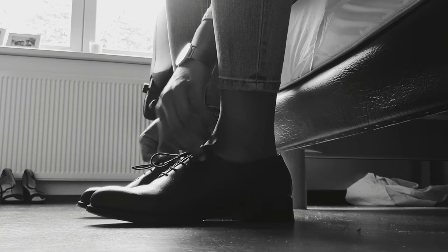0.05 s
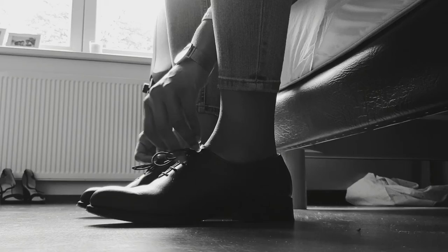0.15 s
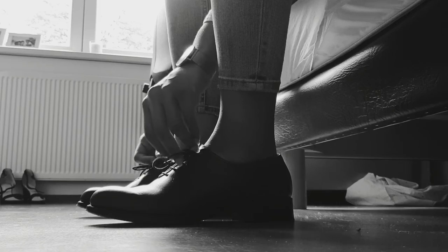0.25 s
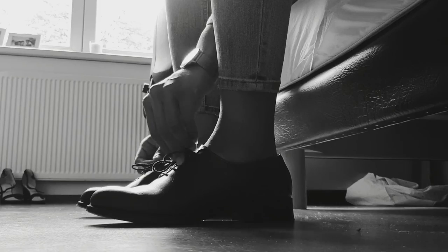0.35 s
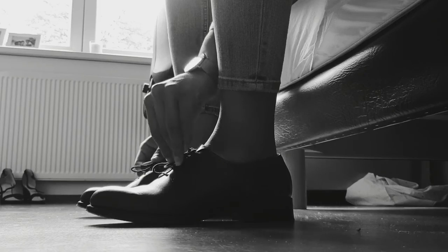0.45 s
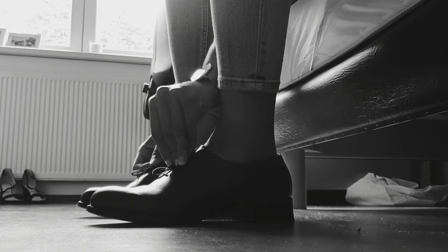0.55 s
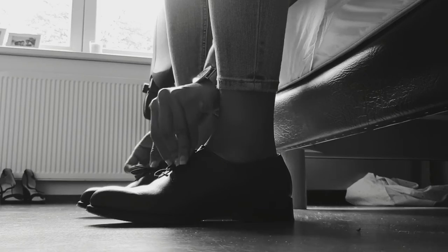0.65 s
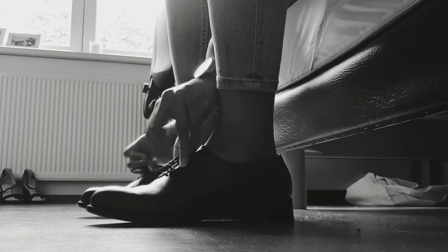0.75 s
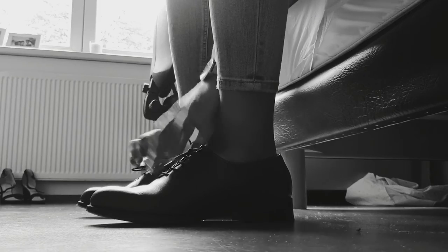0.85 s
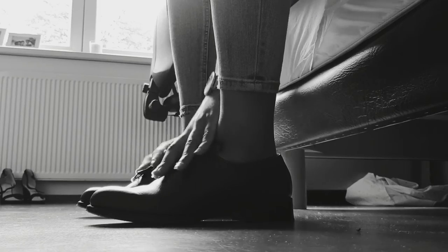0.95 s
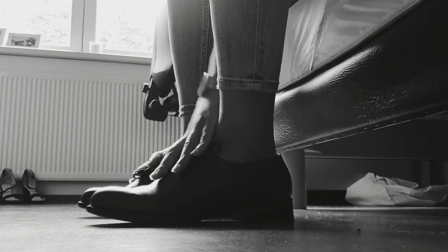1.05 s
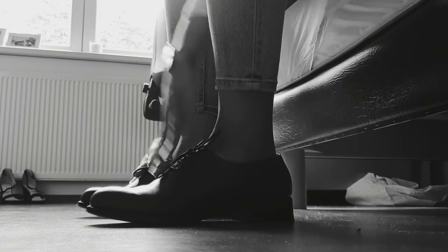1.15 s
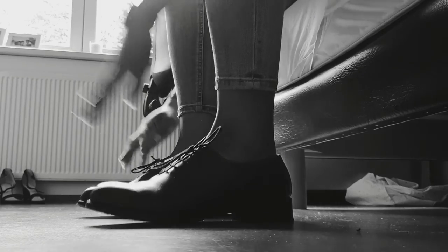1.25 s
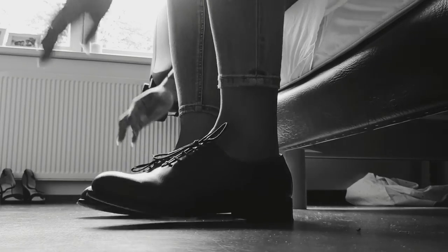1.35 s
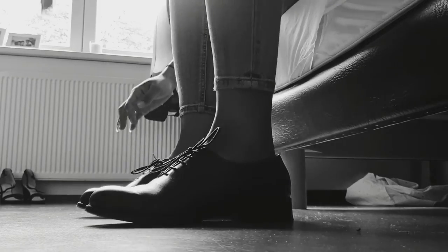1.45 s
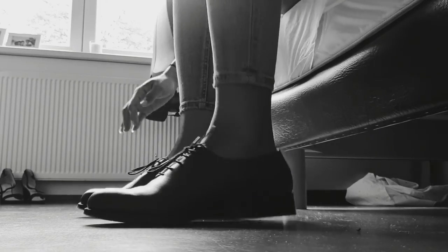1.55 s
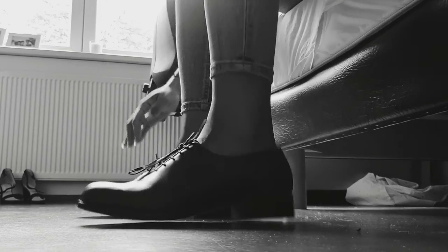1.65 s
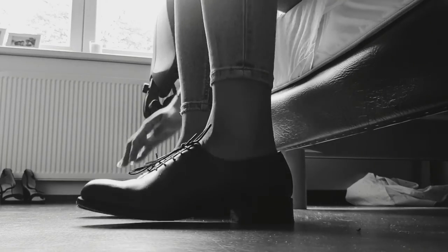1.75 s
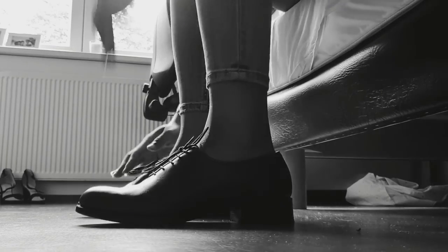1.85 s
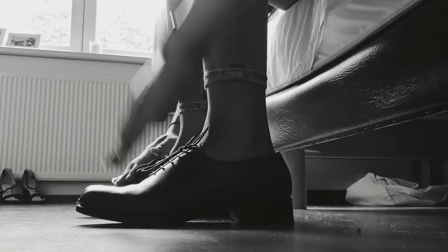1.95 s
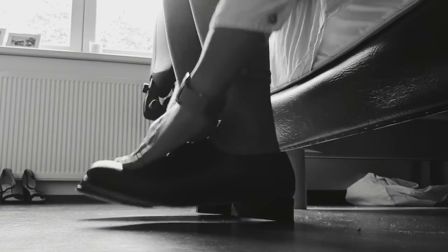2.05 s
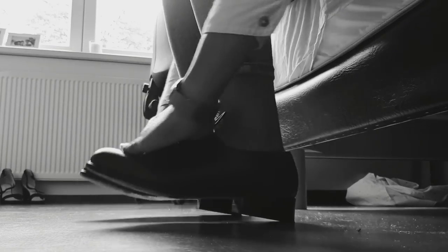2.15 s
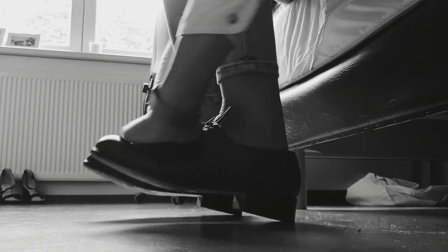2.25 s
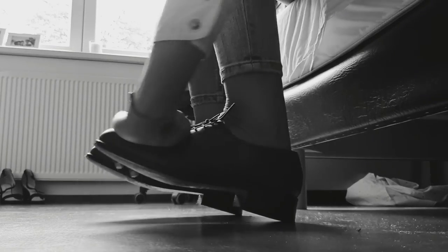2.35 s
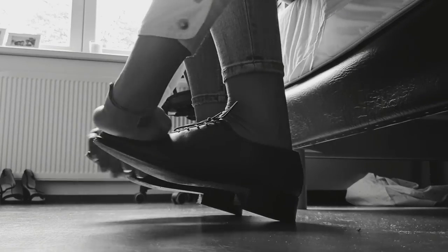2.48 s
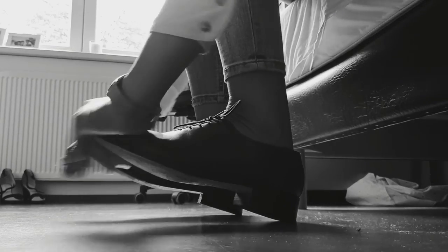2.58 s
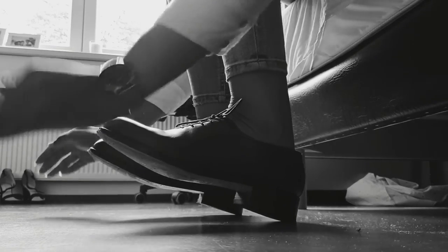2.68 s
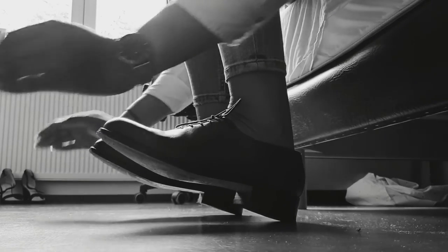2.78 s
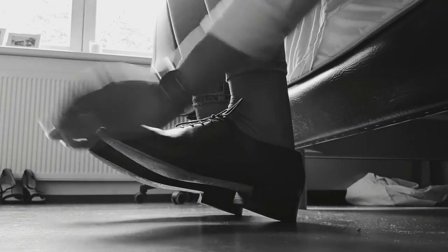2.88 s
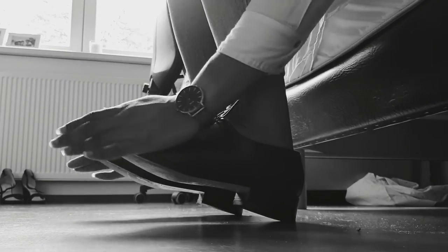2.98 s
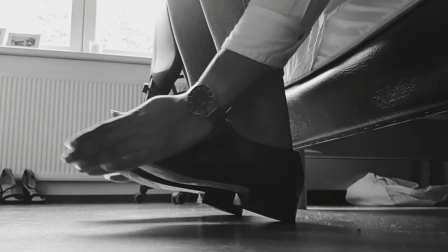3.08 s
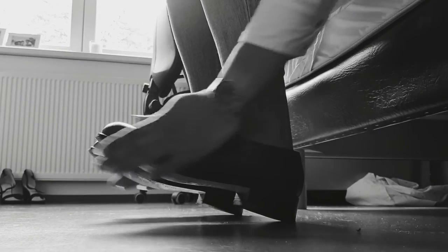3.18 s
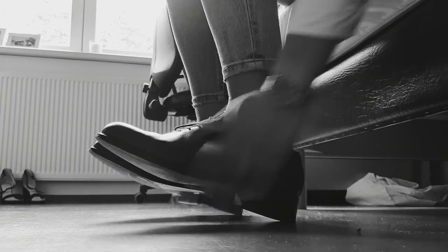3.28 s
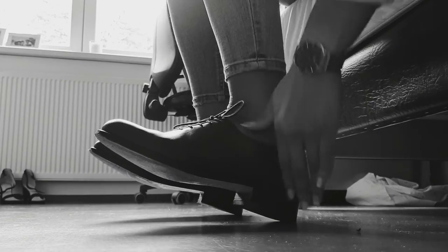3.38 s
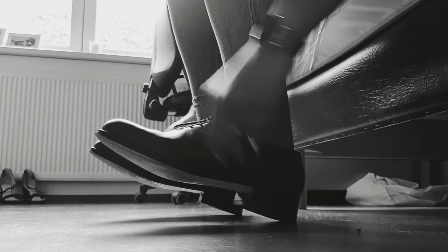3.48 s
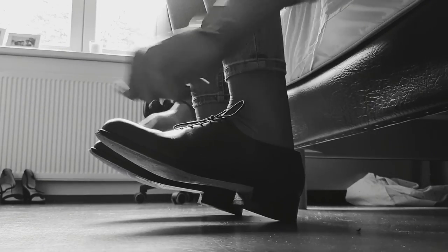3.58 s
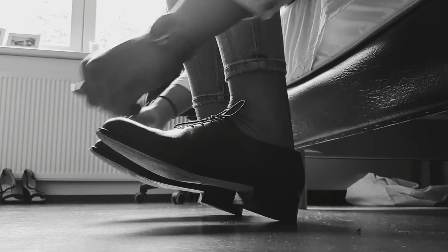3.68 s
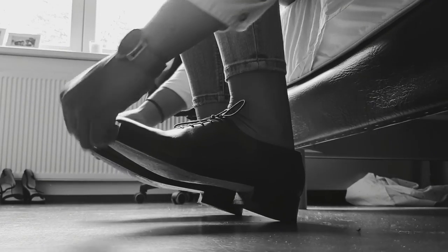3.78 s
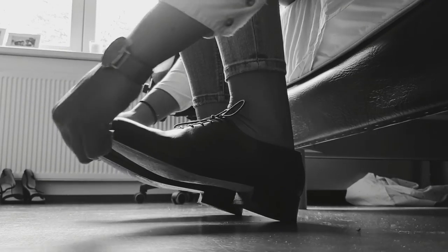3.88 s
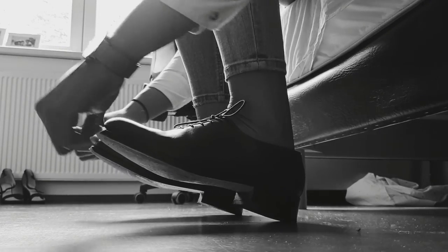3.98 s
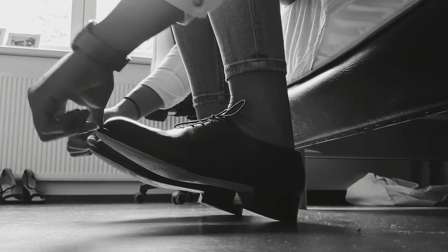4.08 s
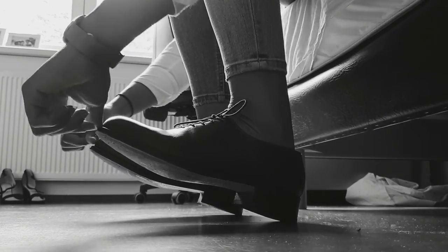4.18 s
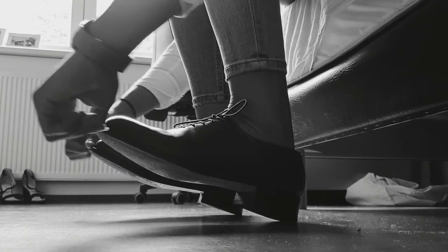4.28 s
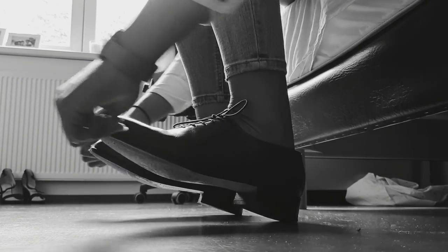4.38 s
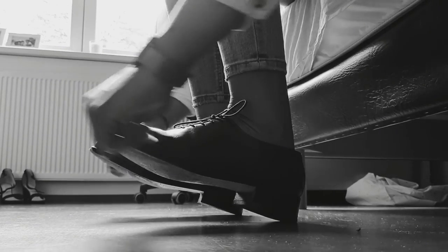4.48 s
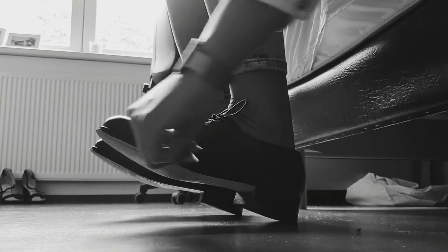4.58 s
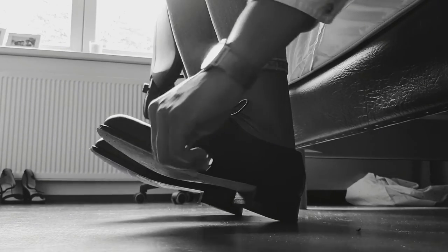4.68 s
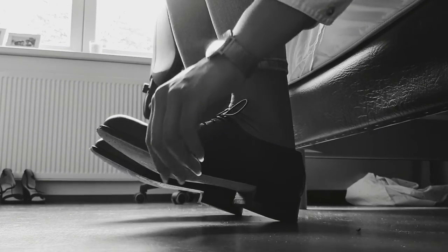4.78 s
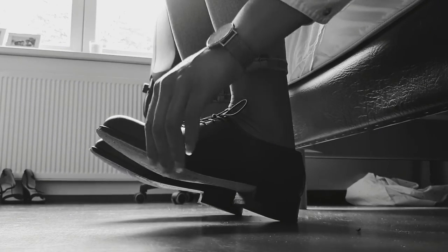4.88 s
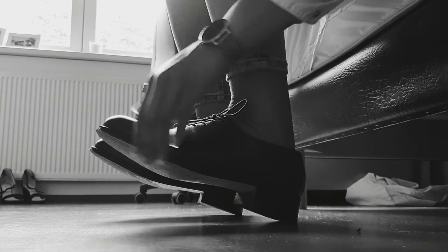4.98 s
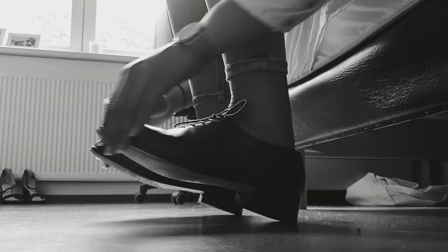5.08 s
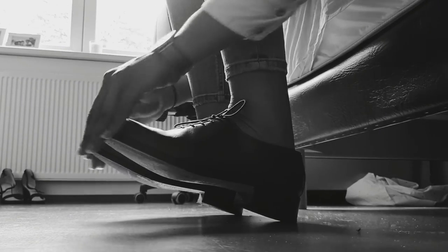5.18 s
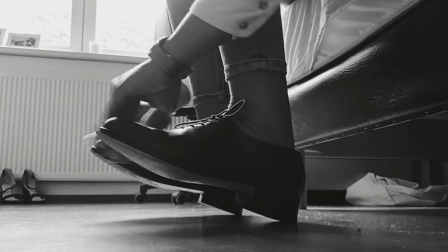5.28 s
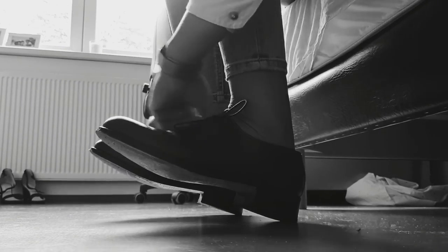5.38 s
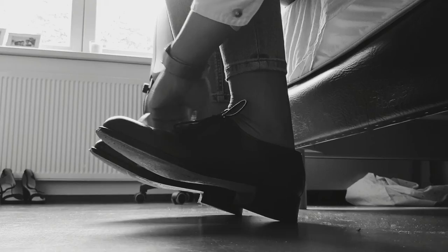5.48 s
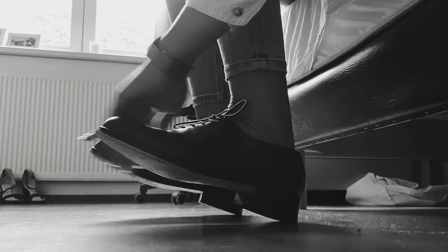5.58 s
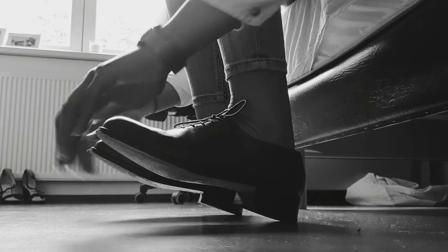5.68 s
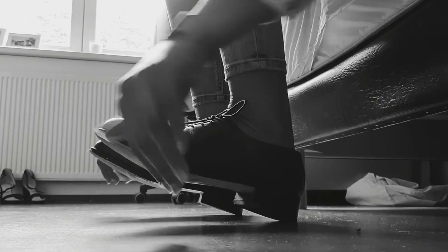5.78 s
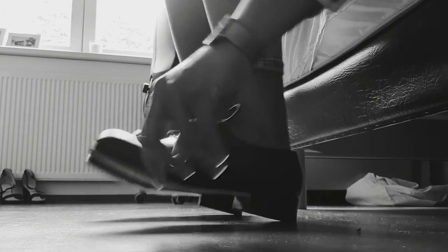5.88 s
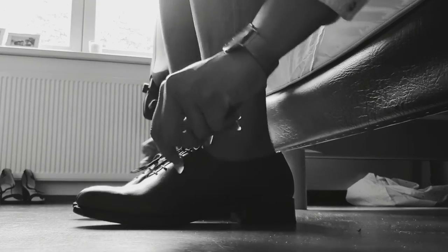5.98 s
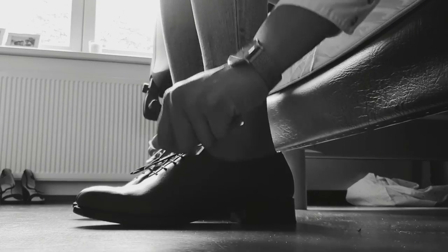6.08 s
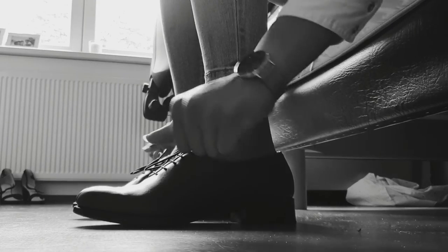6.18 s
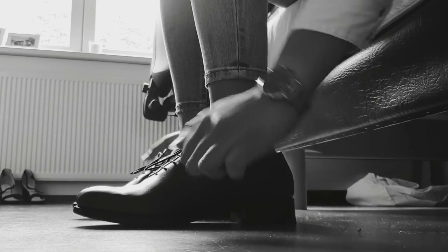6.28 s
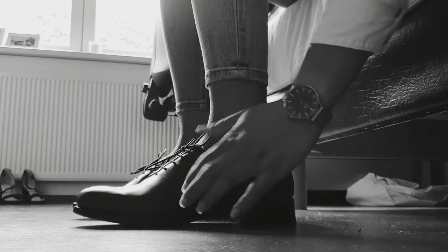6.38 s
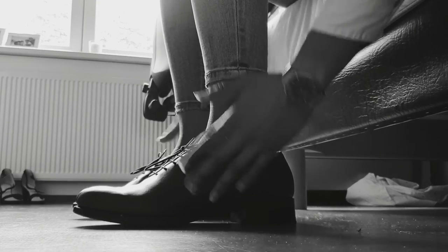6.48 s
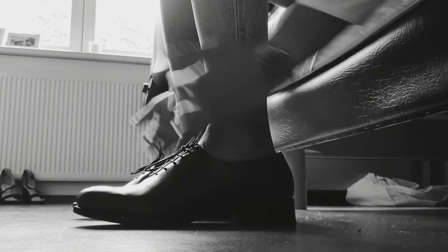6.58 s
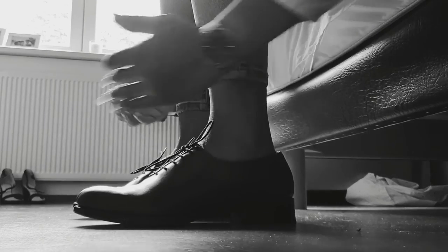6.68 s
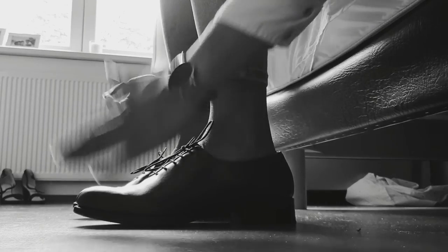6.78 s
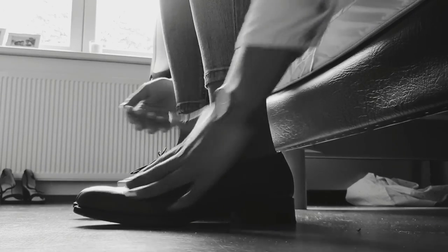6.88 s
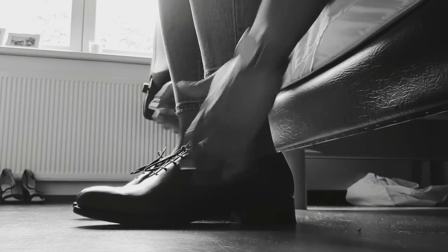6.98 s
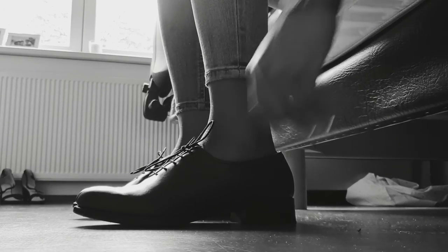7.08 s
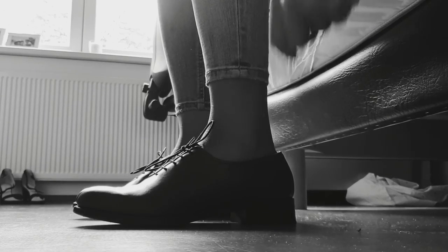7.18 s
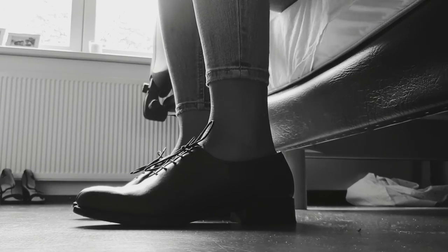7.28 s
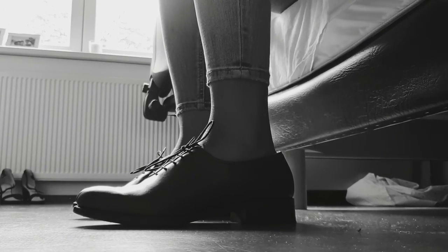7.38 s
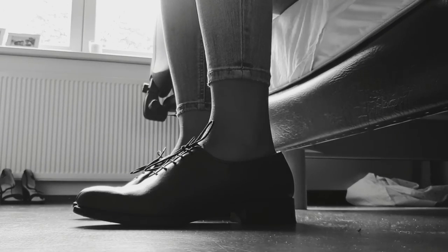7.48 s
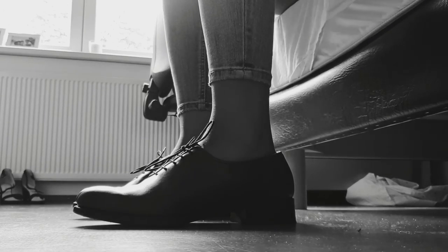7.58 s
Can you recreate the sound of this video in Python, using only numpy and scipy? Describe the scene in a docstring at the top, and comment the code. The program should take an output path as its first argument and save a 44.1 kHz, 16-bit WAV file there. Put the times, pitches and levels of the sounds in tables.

```python
"""Leather shoes on a hard bedroom floor

Close by at floor level, fingers finish the laces, feet shift and palms brush over the leather.
Two soles then slap down almost together, and the hands give a few last touches and wipes.
Impacts are filtered pulses with noise bursts and a room tail, rubbing is shaped noise,
and a wavering sine hum and low noise rumble lie faintly underneath."""
import sys
import numpy as np
from scipy import signal
from scipy.fft import rfft, irfft, next_fast_len
from scipy.io import wavfile
from scipy.ndimage import uniform_filter1d, map_coordinates

SR = 44100
rng = np.random.default_rng(int(sys.argv[2]) if len(sys.argv) > 2 else 0)


def waveform_to_disk(signal):
    """Save audio, clipped to [-1, 1], as 16-bit WAV at the path in sys.argv[1]."""
    frames = np.transpose(np.atleast_2d(signal))
    scaled = np.clip(frames, -1, 1) * 32767
    samples = np.round(scaled).astype(np.int16)
    wavfile.write(sys.argv[1], SR, samples)


N = 337232  # length in samples

# Wavering low hum, level over time: time_s, level_db
HUM_LEVEL = [(0, -70), (1.1, -66), (1.5, -71), (2.5, -59), (5.5, -59), (5.9, -66), (6.6, -61), (6.9, -55),
             (7.65, -66)]
# Colour of the building's rumble: frequency_hz, level_db per Hz
RUMBLE_COLOUR = [(22, -48.5), (33, -28.5), (44, -7), (62, -3.5), (90, -2), (130, -5), (200, -15),
                 (300, -23.5), (450, -36), (900, -51.5)]

# Hand strokes over laces and leather, relative levels at lift-off:
# start_s, length_s, swish_db, drag_db (pressing palm), hiss_db (fine skin)
STROKES = [(0.23, 0.026, -76, -75, -83), (.335, .02, -73, -76, -85), (0.513, .02, -68.5, -78, -72.5),
           (.652, 0.029, -69, -92, -78), (0.822, 0.087, -66.5, -80, -76), (1.03, 0.1, -74.5, -93, -78.5),
           (1.242, 0.071, -74, -78, -75), (1.305, 0.29, -59, -71, -65.5), (2.0, 0.11, -68, -66, -75.5),
           (2.119, 0.076, -51, -59, -60.5), (2.203, 0.11, -57.5, -69, -67.5), (2.289, 0.22, -53, -68, -62),
           (2.504, 0.11, -51.5, -62, -60), (2.653, 0.099, -47, -64, -55), (3.034, 0.064, -48, -58.5, -59.5),
           (3.133, 0.15, -51.5, -71, -59), (3.268, 0.16, -41, -81, -52), (3.552, 0.014, -95, -80, -67.5),
           (3.613, 0.0048, -60, -69, -66.5), (3.682, .045, -90, -90, -65), (4.572, .04, -67.5, -68, -85),
           (4.615, 0.022, -56.5, -56.5, -56), (4.627, 0.055, -51.5, -61.5, -58),
           (5.188, 0.22, -60, -67.5, -65), (5.66, .12, -65, -80, -71.5), (6.202, 0.088, -55.5, -71, -63.5),
           (6.353, 0.013, -72, -88, -66), (6.564, 0.017, -63, -57, -66.5), (6.586, 0.077, -48, -89, -60),
           (6.972, 0.04, -51.5, -53.5, -58), (7.025, 0.09, -54.5, -67, -65.5),
           (7.31, 0.086, -79, -75.5, -75), (7.391, 0.11, -79, -75.5, -76)]
# Colours of the three rubbing layers: frequency_hz, level_db per Hz
SWISH_COLOUR = [(500, -20), (1200, -13.5), (1750, -12.5), (2200, -4.5), (3200, -2), (4800, -1.5),
                (7000, -9.5), (12000, -32.5)]
DRAG_COLOUR = [(150, -18), (400, 6.5), (800, 2), (1500, -1.5), (2200, -4), (4000, -12)]
SKIN_HISS_COLOUR = [(3000, -50), (6000, -9.5), (7700, 1.5), (9500, -7.5), (11500, -0.5), (15000, -6.5)]

# Fingers and lace tips touching leather: start_s, tick_db, tick_pitch_hz, pat_db (dull)
TOUCHES = [(.257, -34, 2050, -32), (0.281, -30, 1980, -45), (.344, -29, 1820, -49), (0.653, -29, 4300, -44),
           (0.887, -33, 2960, -49), (1.037, -37.5, 3420, -32), (2.491, -20, 3060, -14.5),
           (2.569, -21.5, 2500, -9.5), (3.0392, -12, 1050, -21), (3.042, -18, 4360, -32),
           (3.057, -16, 2470, -9.5), (3.096, -17, 2600, -2.5), (3.591, -36, 3500, -27),
           (3.6192, -21, 2560, -24), (3.623, -21, 960, -28.5), (4.6215, -32, 8100, -16),
           (4.638, -12.5, 11200, -19), (4.699, -23, 2000, -17), (6.5669, -17, 4230, -22),
           (6.5721, -12.5, 4520, -12), (6.58, -15, 4540, -4), (6.9742, -28, 4970, -2),
           (6.9773, -46, 1507, 6.5)]
# Resonances of the hollow shoe upper under a pat: frequency_hz, width_hz, level_db
UPPER_MODES = [(188, 94, -5), (400, 274, -9), (590, 70, -32.5)]

# Soles meeting the floor: start_s, thud_db, pop_db (trapped air), pop_pitch_hz, crack_db,
# crack_t60_s, crack_edge_hz (upper edge), boom_db (floor), room_db (board ring and room)
STEPS = [(1.387, -42, -18.5, 534, -46, .011, 2520, -33, 5),
         (1.5865, 4.5, 5.5, 528, -15.5, .0083, 4270, -6, 2),
         (1.697, -40.5, -14, 576, -47, .0068, 3000, -24, -5.5),
         (1.727, -26, -9.5, 417, -57, .01, 2016, -29, 3.5),
         (1.826, 16.5, 13, 437, -17.5, .014, 7740, 16, 1.5),
         (1.9705, 8.5, 4, 954, -9, 0.019, 4100, 22.5, 1), (6.1, -7, -15, 886, -14, .02, 3950, 6.5, -1),
         (6.103, 16, 12, 488, 8.5, .014, 13000, 31, 5), (6.1180, 3.5, 9, 1500, 6.5, 0.029, 7520, 13, 5),
         (6.1210, 18.5, 23, 900, 11, 0.0045, 5440, 37, -9.5),
         (6.1240, 13.5, 9, 383, -4.5, .02, 3000, 10.5, -3.5)]
# Resonances of shoe, floor and boards: frequency_hz, width_hz, level_db
SHOE_MODES = [(204, 110, -1), (353, 240, -6.5)]
FLOOR_MODES = [(61.46, 6.4, -4), (111, 12, -17), (162, 4.2, -14)]
BOARD_MODES = [(200, 8.3, 1), (358, 27, 2.5), (503, 4.6, -1), (557, 28, -5), (807, 33, -0.5),
               (880, 34, -1.5), (1568, 22, -2.5)]
# Colour of the leather crack: frequency_hz, level_db per Hz
CRACK_COLOUR = [(150, -19.5), (600, -6.5), (1450, 2), (1950, -8.5), (2600, 0), (4200, -4), (6500, -9.5),
                (9000, -14.5), (12000, -9.5), (15000, -28.5)]

# Cupped hand ringing near the end of a stroke:
# middle_s, length_s (middle to 1/e), pitch_hz, level_db
SCRAPES = [(2.432, 0.044, 2620, -64), (2.755, 0.023, 1890, -59.5), (3.448, 0.029, 2150, -49),
           (4.684, 0.036, 1690, -60), (5.384, 0.046, 1500, -67), (6.649, 0.01, 2310, -51.5),
           (7.097, 0.029, 2520, -61.5)]

# Decay time of the room tail: frequency_hz, t60_s
ROOM_T60 = [(60, 0.84), (200, 0.4), (600, 0.28), (1200, 0.12), (3500, 0.43), (8000, 0.3), (14000, 0.23)]
# Left-right likeness of diffuse sound: frequency_hz, likeness (0 to 1)
ALIKE = [(100, 0.91), (300, 0.7), (700, 0.1), (1500, 0.083), (4000, .12), (12000, 0.06)]
# Left minus right: PORTS for the microphones' colour, MIC_HISS_LEAN for their own hiss: # frequency_hz,
# difference_db
PORTS = [(60, 1.7), (200, .8), (900, 1.7), (2300, 4.2), (3600, 1.5), (5500, -4), (8500, -5.5),
         (13000, -3.5)]
MIC_HISS_LEAN = [(60, 2.5), (110, 3.5), (200, 2.5), (380, 4.3), (700, 3.0), (1280, 2.114), (2370, 1.8),
                 (4370, 1.3), (8060, 0.5), (14900, 1.5)]
# Colour of the microphones' own hiss: frequency_hz, level_db per Hz
MIC_HISS_COLOUR = [(150, -17.5), (300, -12.5), (450, -15), (800, -18.5), (2000, -22.5), (4000, -25),
                   (8200, -34.5), (11400, -24), (14500, -24.5)]

HUM_HZ = 47  # centre of the drifting pitch
RUMBLE_DB = -61.5  # centre level, before the lean to the left
SWELL_DB_PER_S = 68  # the hand speeds up until it lifts off
RELEASE_DB_PER_S = 200  # fade after lift-off
LANDING_SHARE = 0.18  # time constant of the skin settling, as a share of the stroke
TOP_HZ = 14680  # steep upper limit of the sound


def amp(db):
    """Decibels to gain."""
    return 10 ** (np.asarray(db) / 20)


def unit(x):
    """Scaled to rms 1."""
    return x / np.sqrt(np.mean(x ** 2) + 1e-20)


def along(points, hz):
    """(Hz, value) points read on a log frequency axis."""
    f, v = np.transpose(points)
    return np.interp(np.log(hz + 1), np.log(f + 1), v)


def wobble(rate):
    """A smooth random curve with the given number of knots a second."""
    return map_coordinates(rng.standard_normal(4096), [np.arange(N) * rate / SR], mode="wrap")


def filtered(x, response):
    """x passed through a complex response of frequency."""
    n = x.shape[-1]
    padded = next_fast_len(n + 8192)
    spectrum = rfft(x, padded) * response(np.fft.rfftfreq(padded, 1 / SR))
    return irfft(spectrum, padded)[..., :n]


def resonances(modes, hz):
    """Summed response of damped modes given as (Hz, width Hz, dB)."""
    return sum(amp(db) * 1j * hz * width / (centre * centre - hz * hz + 1j * hz * width)
               for centre, width, db in modes)


def causal(points, hz):
    """Minimum-phase response with the given spectrum, so the energy comes at once."""
    cepstrum = irfft(np.log(amp(along(points, hz))))
    cepstrum[1:] *= 2
    cepstrum[len(cepstrum) // 2:] = 0
    return np.exp(rfft(cepstrum))


def diffuse(pair):
    """Two unrelated noises as two close microphones hear them: most alike in the bass."""
    def blend(hz):
        angle = np.arccos(np.clip(along(ALIKE, hz), -1, 1)) / 2
        return np.array([np.cos(angle), np.sin(angle)])
    mid, side = filtered(pair, blend)
    return np.array([mid + side, mid - side])


def coloured(pair, spectrum):
    """Diffuse stereo sound of rms 1, tinted by the given spectrum."""
    return unit(filtered(diffuse(pair), lambda hz: amp(along(spectrum, hz))))


def burst(t60):
    """Spectrum of a brief stereo spatter of energy 1: a surface lands point by point."""
    t = np.arange(SR // 10) / SR
    envelope = amp(-60 * t / t60) * (1 - np.exp(-t / .0004))
    spatter = diffuse(rng.standard_normal((2, len(t)))) * envelope
    return rfft(unit(spatter) / np.sqrt(len(t)), SR)


def in_room(x, scatter_db, tail_db, scatter_t60):
    """A short sound, an even scatter of reflections, and a room tail whose fade differs by pitch."""
    hz, t, z = signal.stft(rng.standard_normal((2, SR * 3 // 4)), SR, nperseg=256)
    decay = amp(-60 * t / along(ROOM_T60, hz)[:, None])
    tail = signal.istft(z * decay, SR, nperseg=256)[1]
    t = np.arange(tail.shape[1]) / SR
    scatter = rng.standard_normal(tail.shape) * amp(-60 * t / scatter_t60)
    arrive = 1 - np.exp(-(t / 0.0026) ** 2)  # reflections build up over a few milliseconds
    echo = amp(scatter_db) * unit(scatter * arrive) + amp(tail_db) * unit(tail * arrive)
    echo = diffuse(echo / np.sqrt(len(t)))
    return x + signal.fftconvolve(np.atleast_2d(x), echo, axes=1)[:, :x.shape[-1]]


def add(out, s, x):
    """Mix x into out from time s."""
    part = out[:, round(s * SR):][:, :x.shape[-1]]
    part += x[..., :part.shape[1]]


def background():
    """A drifting sine hum and the building's low noise rumble, both a little to the left."""
    hum_level = amp(np.interp(np.arange(N) / SR, *np.transpose(HUM_LEVEL)))
    phase = 2 * np.pi * np.cumsum(HUM_HZ + .7 * wobble(3.8)) / SR
    hum = hum_level * np.sqrt(2) * np.sin(phase)
    rumble_level = amp(RUMBLE_DB + 0.87 * wobble(9))
    rumble = rumble_level * coloured(rng.standard_normal((2, N)), RUMBLE_COLOUR)
    lean = amp(0.6 * np.array([[1], [-1]]))
    return lean * (hum + rumble)


def stroke(start, length):
    """Gain of one stroke: the hand lands, speeds up and lifts off."""
    since = np.arange(N) / SR - start
    landing = 1 - np.exp(-np.maximum(since, 0) / (LANDING_SHARE * length))
    swell_db = SWELL_DB_PER_S * (since - length)
    release_db = RELEASE_DB_PER_S * (length - since)
    return landing * amp(np.minimum(swell_db, release_db))


def friction(spectrum, density, slip_share, patchy_db):
    """Tiny skin slips (density a second) over a smooth rub, the colour drifting by patchy_db."""
    slips = rng.standard_normal(N) * (rng.random(N) < density / SR)
    smooth = rng.standard_normal((2, N))
    rub = np.sqrt(slip_share) * unit(slips) + np.sqrt(1 - slip_share) * smooth
    z = signal.stft(rub, nperseg=512)[2]
    patches = uniform_filter1d(rng.standard_normal(z.shape[1:]), size=6, axis=0)  # across pitch
    patches = uniform_filter1d(patches, size=8, axis=1)  # across time
    patchy = signal.istft(z * amp(patchy_db * unit(patches)), nperseg=512)[1]
    return coloured(patchy[:, :N], spectrum)


def palms():
    """Hands sweep over laces and leather: a swish, a grainy drag under pressure and an even hiss."""
    power = sum(np.outer(amp(levels_db), stroke(s, length)) ** 2 for s, length, *levels_db in STROKES)
    swish_level, drag_level, hiss_level = np.sqrt(power)
    grip = amp(0.43 * wobble(70))  # the skin catches and lets go
    swish_rub = friction(SWISH_COLOUR, density=1400, slip_share=0.45, patchy_db=2.5)
    swish = amp(-4.5) * swish_level * swish_rub
    drag_rub = friction(DRAG_COLOUR, density=670, slip_share=0.38, patchy_db=0.0)
    drag = amp(-0.66) * drag_level * drag_rub
    hiss = amp(1.0) * hiss_level * coloured(rng.standard_normal((2, N)), SKIN_HISS_COLOUR)
    return grip * (swish + drag) + hiss


def fingers():
    """A touch is a bright resonant noise tick and a dull pat that rings the hollow upper."""
    out, hz = np.zeros((2, N)), np.fft.rfftfreq(SR, 1 / SR)
    pat = resonances(UPPER_MODES, hz) / (1 + 1j * hz / 1500) ** 2  # soft fingertips
    for s, tick_db, tick_hz, pat_db in TOUCHES:
        tick = resonances([(tick_hz, 0.58 * tick_hz, 0)], hz) ** 2 * burst(t60=0.00132)
        touch = -irfft(amp(tick_db) * tick + amp(pat_db) * pat)
        add(out, s, in_room(touch, scatter_db=-4.5, tail_db=-5, scatter_t60=0.11))
    return out


def soles():
    """Each sole squeezes out a pop of air, cracks on the floor, thuds and sets the boards ringing."""
    out, hz = np.zeros((2, N)), np.fft.rfftfreq(SR, 1 / SR)
    cushion = 1 / (1 + 1j * hz / 900) ** 2  # the foot softens the low push
    shoe, floor = resonances(SHOE_MODES, hz) * cushion, resonances(FLOOR_MODES, hz) * cushion
    boards, leather = resonances(BOARD_MODES, hz), causal(CRACK_COLOUR, hz)
    for s, thud_db, pop_db, pop_hz, crack_db, crack_t60, edge_hz, boom_db, room_db in STEPS:
        pop = resonances([(pop_hz, 0.73 * pop_hz, 0)], hz) ** 2 / (1 + 1j * hz / (3 * pop_hz))
        hardness = 1 / (1 + 1.4j * hz / edge_hz - (hz / edge_hz) ** 2)  # a low edge dulls the landing
        crack = leather * burst(crack_t60) * hardness
        blow = amp(thud_db) * shoe + amp(pop_db) * pop + amp(crack_db) * crack
        add(out, s, in_room(-irfft(blow), room_db - 8.5, room_db - 4.0, scatter_t60=0.48))
        answer = amp(room_db - 4.5) * blow * boards + amp(boom_db) * floor
        add(out, s + .003, -irfft(answer))  # the floor answers a moment later
    return out


def scrapes():
    """Friction caught in the hollow of the hand swells and fades on one rough pitch."""
    out, t = np.zeros((2, N)), np.arange(SR // 4) / SR
    middle = t.mean()
    for s, length, pitch_hz, db in SCRAPES:
        hollow = lambda hz: resonances([(pitch_hz, .3 * pitch_hz, 0)], hz) ** 2
        rub = unit(filtered(diffuse(rng.standard_normal((2, len(t)))), hollow))
        swell = np.exp(-((t - middle) / length) ** 2)
        add(out, s - middle, amp(db) * rub * swell)
    return out


def scene():
    """The room, the hands and the feet together."""
    return background() + palms() + fingers() + soles() + scrapes()


def record(dry):
    """Two microphones of differing colour hiss faintly; left hears first; deep bass and top are cut."""
    lead = 3.5 / SR  # seconds by which the left is ahead
    sides = np.array([[.5], [-.5]])  # each side takes half of every left-right difference

    def microphones(hz):
        colour = amp(sides * along(PORTS, hz)) * np.exp(2j * np.pi * hz * lead * sides)
        low_cut = (1j * hz / 40) ** 2 / (1 + 1j * hz / 40 - (hz / 40) ** 2)
        return colour * low_cut

    hiss = coloured(rng.standard_normal((2, N)), MIC_HISS_COLOUR)
    hiss = filtered(hiss, lambda hz: amp(sides * along(MIC_HISS_LEAN, hz)))
    heard = filtered(dry, microphones) + amp(-76.5) * hiss
    return filtered(heard, lambda hz: 1 / np.sqrt(1 + (hz / TOP_HZ) ** 200))


dry = scene()
out = record(dry)
waveform_to_disk(out)
```